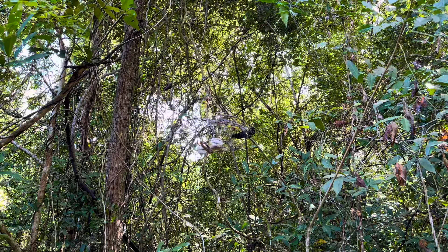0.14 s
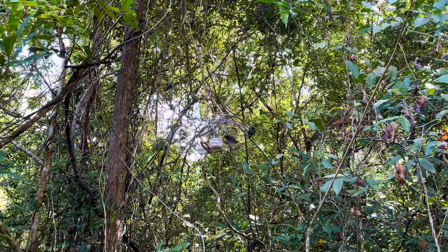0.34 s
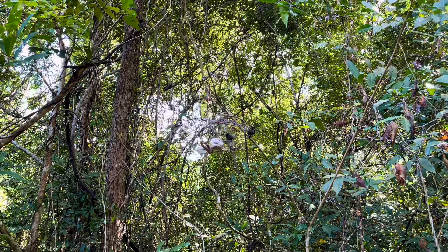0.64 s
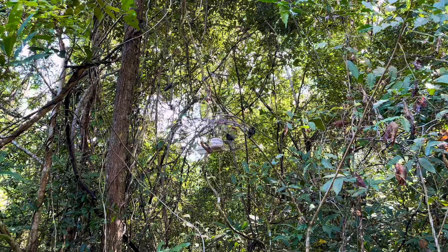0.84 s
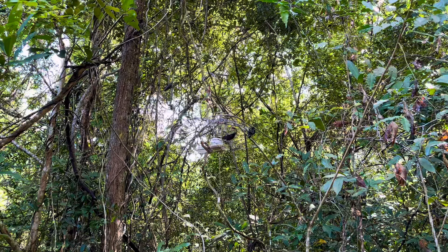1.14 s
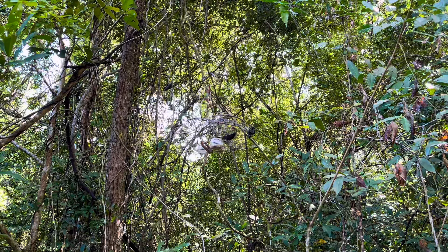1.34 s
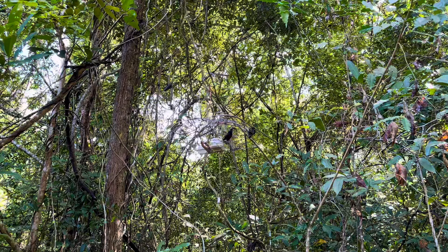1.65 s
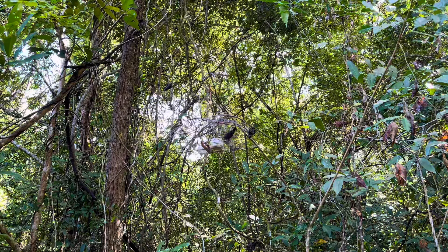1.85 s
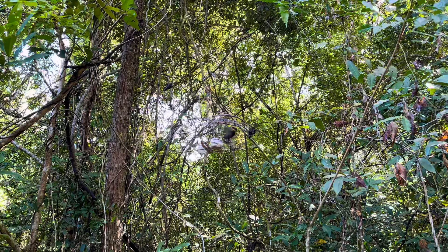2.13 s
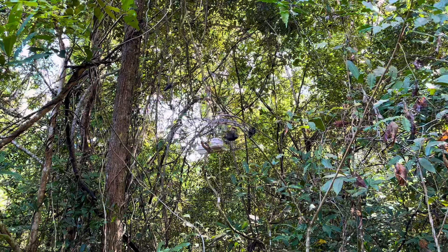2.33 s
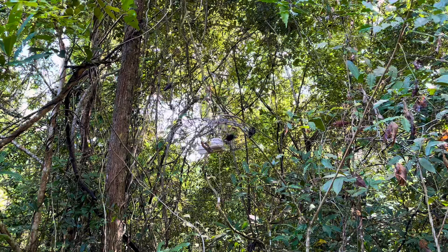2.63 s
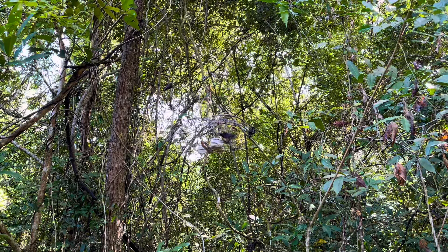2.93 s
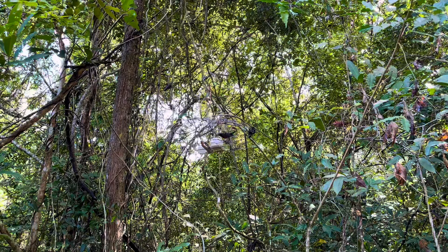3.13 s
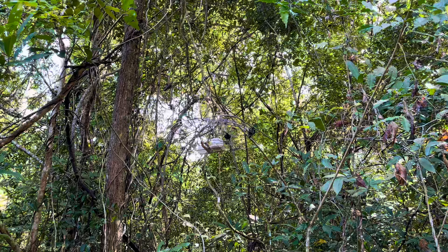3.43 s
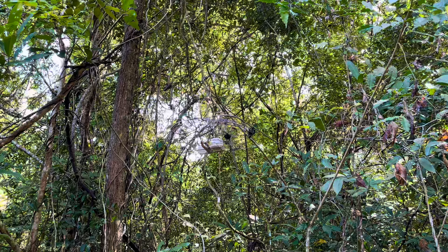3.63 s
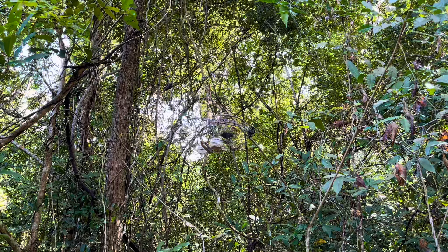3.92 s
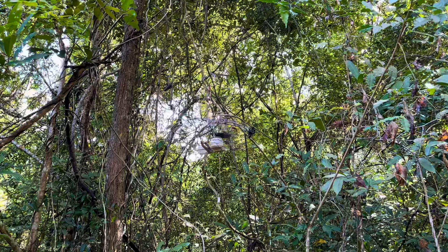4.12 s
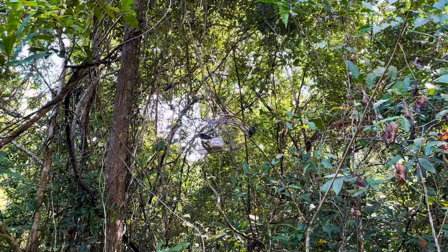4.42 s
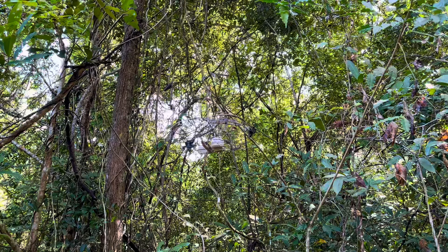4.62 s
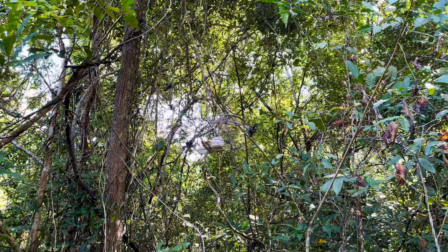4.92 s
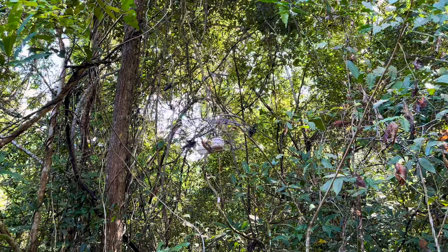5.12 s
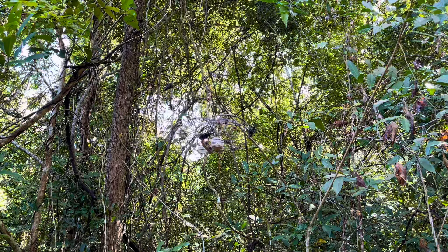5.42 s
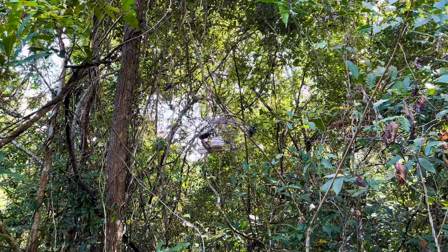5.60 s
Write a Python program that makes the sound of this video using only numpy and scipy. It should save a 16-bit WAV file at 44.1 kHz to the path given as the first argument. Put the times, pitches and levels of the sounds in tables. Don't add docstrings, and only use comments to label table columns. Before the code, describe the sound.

Crickets chirp in quick steady pulses to the left over a far insect chorus, while a small bird sings brief gliding chirps above faint rumble.

```python
import sys
import numpy as np
from scipy import signal
from scipy.fft import rfft, irfft, next_fast_len
from scipy.io import wavfile
from scipy.ndimage import uniform_filter1d, map_coordinates

SR = 44100
rng = np.random.default_rng(int(sys.argv[2]) if len(sys.argv) > 2 else 0)


def to_wav(sig):
    pcm = np.clip(np.atleast_2d(sig), -1, 1) * 32767
    pcm = np.round(pcm).astype(np.int16)
    wavfile.write(sys.argv[1], SR, pcm.T)


def makeup_ratio(level_db):
    decades = np.asarray(level_db, float) / 20
    return 10 ** decades


N = 254016


def unit(x):
    return x / np.sqrt(np.mean(x ** 2) + 1e-20)


def along(points, hz):
    f, v = np.transpose(points)
    return np.interp(np.log(hz + 1), np.log(f + 1), v)


def curve(rows):
    s, v = np.transpose(rows)
    return np.interp(np.arange(N) / SR, s, v)


def wobble(rate_hz, size=N):
    knots = rng.standard_normal(int(size * rate_hz / SR) + 4)
    return map_coordinates(knots, [np.arange(size) * rate_hz / SR])


def filtered(x, response):
    m = next_fast_len(N + 8192)
    return irfft(rfft(x, m) * response(np.fft.rfftfreq(m, 1 / SR)), m)[..., :N]


def ports(x, left_db, right_db, delay):
    late = filtered(x, lambda hz: np.exp(-2j * np.pi * hz * delay / SR))
    return np.array([makeup_ratio(left_db) * x, makeup_ratio(right_db) * late])


def add(track, s, x):
    part = track[..., max(round(s * SR), 0):][..., :x.shape[-1]]
    part += x[..., :part.shape[-1]]


def rush(spectrum, patchy_db):
    # f/Hz, correlation (-1 to 1)
    likeness = [(30, .92), (70, .94), (130, .87), (300, .25), (700, -.35), (4000, -.1), (8000, .4),
                (13000, .6)]
    z = signal.stft(rng.standard_normal((2, N + 512)), nperseg=512)[2]
    patches = uniform_filter1d(uniform_filter1d(rng.standard_normal(z.shape[1:]), 6, 0), 14, 1)
    pair = signal.istft(z * makeup_ratio(patchy_db * unit(patches)), nperseg=512)[1][:, :N]

    def mid_side(hz):
        turn_rad = np.arccos(np.clip(along(likeness, hz), -1, 1)) / 2
        return makeup_ratio(along(spectrum, hz)) * [np.cos(turn_rad), np.sin(turn_rad)]

    mid, side = filtered(pair, mid_side)
    return unit(np.array([mid + side, mid - side]))


def thicket(x, late_db):
    # f/Hz, t60/s, level/dB
    leaves = [(1000, 0.12, 0.5), (2600, 0.097, -2.5), (3250, .08, -1.5), (4800, 0.14, 0.5),
              (6250, 0.095, 4.5), (7440, 0.076, 3.5), (14600, 0.03, -5.5)]
    # f/Hz, correlation (-1 to 1)
    likeness = [(3000, .3), (5000, -.2), (7000, .3), (9000, .5), (14000, .65)]
    out, step = np.zeros((2, N)), SR // 3
    hz, t, z = signal.stft(rng.standard_normal((N // step + 1, 2, step)), SR, nperseg=256)
    turn_rad = np.arccos(np.clip(along(likeness, hz), -1, 1))[:, None] / 2
    z = z[:, :1] * np.cos(turn_rad) + z[:, 1:] * np.sin(turn_rad) * [[[1]], [[-1]]]
    t60, db = (along(np.array(leaves)[:, [0, k]], hz)[:, None] for k in (1, 2))
    decay = makeup_ratio(-60 * t / t60) + makeup_ratio(late_db - 60 * t / (4 * t60))
    tails = signal.istft(z * makeup_ratio(db) * decay, SR, nperseg=256)[1]
    for k, tail in enumerate(tails):
        block = x[None, k * step:][:, :step]
        echo = signal.fftconvolve(block, tail / np.linalg.norm(tail[0]), axes=1)
        add(out, k * step / SR + 0.0034, echo)
    return out


def traffic():
    # t/s, level/dB
    road = [(0.0, -53), (0.03, -52), (0.3, -58), (0.35, -49.5), (0.46, -54), (5.61, -52.5), (5.76, -59.5)]
    # f/Hz, density/(dB per Hz)
    rumble_spectrum = [(25, -37), (33, -21.5), (42, -6), (54, 1.5), (75, 0), (116, -5.5), (173, -12.5),
                       (219, -21.5), (300, -38), (390, -52.5), (660, -120)]
    # f/Hz, density/(dB per Hz)
    air_spectrum = [(130, -20.5), (220, -9.5), (300, -7.5), (500, -11), (1000, -15), (2000, -19.5),
                    (3000, -27), (3750, -19.5), (4200, -2), (4900, -2), (5500, -10.5), (6000, -16.5),
                    (6700, -18.5), (7250, -31.5), (8500, -17.5), (10000, -46), (11200, -42.5),
                    (13000, -29.5), (15800, -36.5)]
    # start/s, length/s, first f/Hz, last f/Hz, top level/dB
    whines = [
        (1.52, .12, 392, 380, -76),
        (1.65, .13, 332, 322, -69),
        (1.55, .47, 1140, 1262, -83),
        (3.85, 1.3, 445, 450, -87),
        (4.1, .7, 1265, 1345, -77),
        (5.36, .08, 1520, 1540, -72),
        (5.43, .12, 1535, 1520, -65),
        (5.6, .11, 1520, 1550, -78),
        (5.71, .08, 1870, 1760, -77),
    ]
    rumble_db = curve(road) + 1.3 * wobble(7.4)
    air_db = -62.5 + 0.4 * wobble(2.8)
    drone = np.zeros(N)
    for hz, db in ((166, -66.5), (133, -66)):
        level = makeup_ratio(db + 2.5 * wobble(4))
        drone += level * np.sin(2 * np.pi * np.cumsum(hz + 2.0 * wobble(3)) / SR)
    whine = np.zeros(N)
    waver, breaks_db = 0.009 * wobble(90), 3 * wobble(12)
    for s, length, first_hz, last_hz, db in whines:
        u = np.clip((np.arange(N) / SR - s) / length, 0, 1)
        hz = (first_hz + (last_hz - first_hz) * u) * (1 + waver * (1 + 3 * length))
        phase = 2 * np.pi * np.cumsum(hz) / SR
        level = makeup_ratio(db + breaks_db * min(length / 0.5, 1))
        whine += level * np.abs(np.sin(np.pi * u)) * np.sin(phase)
    rumble = makeup_ratio(rumble_db) * rush(rumble_spectrum, patchy_db=-1.0) * makeup_ratio([[1.1], [-1.3]])
    rumble = np.array([rumble[0], np.roll(rumble[1], 24)])
    air = makeup_ratio(air_db) * rush(air_spectrum, patchy_db=3.0) * makeup_ratio([[2.1], [-2.4]])
    return rumble + drone + air + ports(whine, 6.4, -3.0, delay=19)


def stroke(length_ms, first_hz, last_hz):
    u = np.linspace(0, 1, max(round(length_ms * SR / 1000), 8))
    phase = 2 * np.pi * np.cumsum(first_hz + (last_hz - first_hz) * u) / SR
    scrape = np.diff(rng.standard_normal(SR // 40))[:len(u)]
    over = np.sin(2 * phase) + makeup_ratio(-18.5) * np.sin(3 * phase) + makeup_ratio(-4) * scrape
    tone = np.sin(np.pi * u) ** 2 * np.sin(phase)
    return np.array([tone, np.sin(np.pi * u ** 0.75) ** 2.43 * over])


def chorus(count=1200):
    # t/s, level/dB
    swell = [(0, -66), (.9, -63), (1.7, -68.5), (2.5, -67), (3.1, -63.5), (4.7, -62), (5.3, -62.5),
             (5.76, -60.5)]
    wings = np.zeros((2, N))
    for s, pitch, length, size in rng.random((count, 4)):
        first_hz = 4800 + 600 * pitch ** 1.3
        add(wings, s * N / SR, makeup_ratio(9 * size) * stroke(5 + 5 * length, first_hz, first_hz - 1050))
    song = wings[0] + makeup_ratio(-29.5) * wings[1]
    both = ports(song, -1.5, -6, delay=15) + thicket(song, late_db=-6) * makeup_ratio([[-12], [-13]])
    return makeup_ratio(curve(swell) + 9.0) * unit(both)


def cricket(chirps, wing):
    wings = np.zeros((2, N))
    chance = rng.standard_normal((len(chirps), len(wing), 3))
    for (s, db), draws in zip(chirps, chance):
        for (ms, length_ms, first_hz, last_hz, stroke_db), (a, b, c) in zip(wing, draws):
            tune = 1 + 0.011 * a
            closure = stroke(length_ms * (1 + 0.074 * b), first_hz * tune, last_hz * tune)
            add(wings, s + (ms - length_ms / 2) / 1000, makeup_ratio(db + stroke_db + 0.49 * c) * closure)
    return wings


def crickets():
    # t/s, peak level at the left port/dB
    chirps_near = [(0.1192, -34), (0.3107, -32), (0.5173, -34.5), (0.733, -33.5), (0.946, -35),
                   (1.1276, -32), (1.3112, -33.5), (1.4934, -33.5), (1.6841, -33.5), (1.8808, -32.5),
                   (2.0872, -34.5), (2.268, -35.5), (2.443, -35), (2.629, -34), (2.8203, -33.5),
                   (3.005, -33.5), (3.2009, -36.5), (3.3872, -31.5), (3.589, -39), (3.785, -34),
                   (3.9795, -33), (4.1765, -34.5), (4.3718, -34), (4.5766, -33.5), (4.769, -33.5),
                   (4.957, -35.5), (5.1428, -36.5), (5.331, -33), (5.522, -33), (5.721, -33.5)]
    chirps_side = [(2.148, -35.5), (2.339, -36.5), (2.57, -35), (2.7817, -33.5), (2.9856, -34),
                   (3.1931, -33), (3.388, -37), (3.584, -32.5), (3.7972, -32), (4.0087, -33), (4.2162, -34),
                   (4.4301, -32.5), (4.687, -31), (4.924, -32), (5.1393, -32), (5.385, -32), (5.654, -33.5)]
    chirps_high = [(0.0779, -33.5), (0.2672, -36), (0.4554, -37), (0.646, -36), (0.8654, -33),
                   (1.0654, -34), (1.2568, -34), (1.4501, -33), (1.6368, -33.5), (1.8288, -33),
                   (2.0278, -32), (2.216, -31.5), (2.4052, -34.5), (2.6049, -31), (2.8005, -32),
                   (3.0176, -36.5), (3.208, -35), (3.399, -30.5), (3.601, -44.5), (3.802, -43),
                   (3.9934, -38), (4.193, -36), (4.4155, -33.5), (4.6163, -36), (4.8536, -37),
                   (5.0546, -34.5), (5.2663, -34.5), (5.4588, -35.5), (5.6592, -33.5)]
    # t/s, peak level/dB
    chirps_stray = [
        (1.552, -50),
        (1.71, -42.5),
    ]
    # offset/ms, length/ms, first f/Hz, last f/Hz, level/dB
    wing_near = [
        (-15, 8.5, 4950, 3950, -2.5),
        (.1, 17, 4800, 4080, 0),
    ]
    wing_side = [
        (-15.5, 6.5, 4700, 3400, -8),
        (-1, 12, 5200, 3500, 0),
    ]
    wing_high = [
        (-14, 6.5, 5250, 4300, -7),
        (.1, 11, 5250, 4300, 0),
    ]
    # right port/dB, right delay/samples, overtones left/dB, overtones right/dB
    places = [
        (-8, 12.7, -35, -34),
        (-42, 44, -29.5, -23.5),
        (-6.5, 13.57, -38, -35),
    ]
    all_chirps = (chirps_near, list(chirps_stray) + list(chirps_side), chirps_high)
    direct, scatter = 0, 0
    for chirps, wing, place in zip(all_chirps, (wing_near, wing_side, wing_high), places):
        tone, over = cricket(chirps, wing)
        right_db, delay, over_left_db, over_right_db = place
        direct += ports(tone, 0, right_db, delay) + over * makeup_ratio([[over_left_db], [over_right_db]])
        scatter += tone + makeup_ratio(over_left_db + 13) * over
    return direct + makeup_ratio([[-10], [-14]]) * thicket(scatter, late_db=-13.0)


def soloists():
    # t/s, peak level/dB, middle f/Hz
    strokes = [(0.1494, -31.5, 4490), (0.1613, -42, 4630), (0.1839, -42, 4750.0), (0.2082, -44.5, 4660.0),
               (0.252, -41, 4790), (0.3416, -42.5, 4600), (0.4424, -39.5, 4600), (0.5405, -43.0, 4460.0),
               (0.67, -46, 4900), (0.6789, -46, 4700), (0.6883, -40.5, 4460.0), (0.7, -36.5, 4700),
               (0.7658, -58, 4760.0), (0.7848, -38.5, 4470.0), (0.8304, -38.5, 4500), (1.0833, -35, 4680),
               (1.1643, -44, 4450), (1.2441, -49, 4650), (1.3316, -40.5, 4420), (1.5543, -59, 4500),
               (1.6572, -38, 4820.0), (1.9377, -45, 4510.0), (1.9734, -43.0, 4700), (2.0454, -43, 4800),
               (2.133, -48.5, 4420.0), (2.1701, -51, 4400), (2.2905, -41, 4300), (2.3826, -33.5, 4620),
               (2.8507, -49, 4530), (2.8927, -49, 4510.0), (2.9414, -39.5, 4800), (3.1211, -38, 4630.0),
               (3.2224, -41.5, 4580), (3.2508, -51.5, 4650), (3.4959, -41, 4600), (3.6381, -53, 4600),
               (3.6682, -43.8, 4420), (3.6802, -39, 4840.0), (3.7082, -37.5, 4500.0), (3.7378, -54, 4700),
               (3.8708, -38, 4730), (3.904, -42.5, 4700), (3.9225, -42, 4760), (3.9363, -48.5, 4730),
               (4.063, -37.5, 4770), (4.0842, -46.5, 4690.0), (4.1162, -46, 4530), (4.1327, -45, 4460.0),
               (4.2624, -41.5, 4530), (4.3176, -45, 4800.0), (4.34, -51, 4630), (4.5109, -39, 4700),
               (4.6613, -36.5, 4580.0), (4.8278, -47, 4560), (4.8426, -42, 4680), (5.0123, -39.5, 4474),
               (5.1047, -41, 4530), (5.2062, -37, 4750), (5.558, -49.5, 4350), (5.6052, -48, 4540)]
    length_ms, fall_hz = 9, 950
    wings = np.zeros((2, N))
    for s, db, hz in strokes:
        closure = stroke(length_ms, hz + fall_hz / 2, hz - fall_hz / 2)
        add(wings, s - length_ms / 2000, makeup_ratio(db - 2.5) * closure)
    song = wings[0] + makeup_ratio(-25.5) * wings[1]
    return ports(song, -0.46, -11, delay=15.8)


def syllables():
    song = {"fall": [(.2695, 1.02, 1.002, -49)], "sweep": [(4.686, 1.001, 1.001, -46)],
            "crest": [(4.738, 0.73, .8, -49)], "hump": [(.478, 1.07, 1, -45.5), (.846, 1.08, 1.017, -46),
            (1.857, 1.1, .95, -47), (3.269, 1.04, 0.98, -45.5)], "dip": [(.937, 0.98, 0.75, -59),
            (1.951, 1, 0.85, -55.5), (3.356, 0.9, 1.1, -56)], "peak": [(.9982, 0.97, 1.04, -41.5),
            (2.0115, 1.02, 1.01, -42.5)], "spike": [(.615, 1.08, .99, -42), (3.4125, 1.01, 1.01, -41.5)],
            "hook": [(.386, 1, 1, -45), (.718, 0.87, 1.01, -46), (1.093, 0.74, 1.003, -43.5),
            (3.506, 0.71, 1, -43.5)]}
    follows = {"hump": ("rise", 0.026, 0.99, 0.98, 1.5), "dip": ("lift", 0.017, 0.9, 0.98, 8.6),
               "sweep": ("crest", .051, 1.001, 1.001, 1.5)}
    for name, rows in song.items():
        for s, stretch, factor, db in rows:
            yield name, s, stretch, factor, db
            if name in follows:
                second, lag_s, own_stretch, own_factor, louder_db = follows[name]
                yield second, s + lag_s * stretch, own_stretch, own_factor, db + louder_db


def bird(rasp=0.7, flutter=1.7, flutter_hz=620):
    # t/ms, f/Hz, level/dB
    FALL = [(0, 2800, -9), (5, 2700, 0), (13, 2480, 0), (22, 2080, -4), (31, 1500, -12)]
    HOOK = [(0, 3280, -10), (4, 3150, -2), (11, 3030, 0), (17, 3020, 0), (20, 3350, -3), (26, 5000, -1),
            (32, 6100, -6)]
    HUMP = [(0, 2650, -6), (6, 2850, 0), (11, 2900, 0), (16, 2550, -5), (22, 1800, -16)]
    RISE = [(0, 2550, -16), (4, 3150, -6), (10, 3400, -1), (17, 3480, 0), (25, 3560, -4)]
    PEAK = [(0, 2200, -9), (3, 3500, -3), (6.5, 4600, 0), (10, 3000, -4), (13, 2150, -6), (20, 2050, -10),
            (34, 1950, -22)]
    DIP = [(0, 2400, -20), (4, 1950, -2), (9, 1400, -3), (17, 1150, -9)]
    LIFT = [(0, 1700, -16), (4, 2600, -4), (9, 2900, 0), (14, 2900, -6)]
    SWEEP = [(0, 2300, -24), (12, 2500, -7), (26, 2900, 0), (36, 3500, -4), (48, 4500, -6), (58, 5300, -10)]
    CREST = [(0, 4900, -14), (6, 5700, 0), (14, 6900, -1), (24, 6900, -12)]
    SPIKE = [(0, 2000, -9), (3, 3300, -3), (6.5, 4600, 0), (10, 3000, -4), (14, 2150, -11), (24, 1900, -22)]
    voices = {"fall": (FALL, (-2.5, -16.5, -13, -8)), "hook": (HOOK, (-8.5, -12.5, -7, -25.5)),
              "hump": (HUMP, (-7.5, -8, -9, -11)), "rise": (RISE, (-13.5, -12, -7.5, -21)),
              "peak": (PEAK, (-7.5, -10.5, -11, -18)), "spike": (SPIKE, (-6.5, -12.5, -7, -21)),
              "dip": (DIP, (5.5, 0.5, -19, -8)), "lift": (LIFT, (-10.5, -10.5, -5, -8.5)),
              "sweep": (SWEEP, (0, -1, 0.5, -7)), "crest": (CREST, (-6, -12.5, -14, -25))}
    roughness = {"fall": .22, "hook": .07, "hump": .15, "rise": .14, "peak": .3, "spike": .3, "dip": .6,
                 "lift": .4, "sweep": .48, "crest": .6}
    # f/Hz, level/dB
    beak = [(1200, -12), (3000, -4.5), (6000, 7.5), (9000, 2.5), (14000, 11.5)]
    # f/Hz, left-right/dB, left lead/rad
    bearing = [(2000, 0.5, 0.96), (3460, 3, 0.69), (6660, 6.5, 0.95), (9900, 0.5, 1.54),
               (12900, 10.5, 0.18)]
    # f/Hz, level/dB
    direct_treble = [(9500, 0), (11500, -22)]
    voice = np.zeros(N)
    span = SR // 14
    for name, s, stretch, factor, note_db in syllables():
        (shape, overtones_db), rough = voices[name], roughness[name]
        ms, hz, db = np.transpose(shape)
        t_ms = np.arange(0, ms[-1] * stretch, 1000 / SR)[:span]
        shake = wobble(700, size=span)[:len(t_ms)]
        swell = rough * np.tanh(wobble(1400, size=span)[:len(t_ms)])
        air = rng.standard_normal(span + 4)
        pitch = uniform_filter1d(np.interp(t_ms, ms * stretch, hz * factor), 60)
        phase = 2 * np.pi * np.cumsum(pitch * (1 + 0.04 * rough * shake)) / SR
        edge = np.clip(np.minimum(t_ms, t_ms[-1] - t_ms) / 2.2, 0, 1)
        over = np.zeros(len(t_ms))
        for k, db_k in enumerate(overtones_db, 2):
            over += makeup_ratio(db_k) * np.sin(k * phase) * (k * pitch < SR / 2)
        over *= 1 + flutter * rough * np.sin(2 * np.pi * flutter_hz * t_ms / 1000)
        over += rasp * rough ** 2 * (air[4:] - air[:-4])[:len(t_ms)]
        level = makeup_ratio(note_db + np.interp(t_ms, ms * stretch, db)) * edge
        add(voice, s, level * (np.sin(phase) * (1 + swell) + over * (1 + 2.0 * swell)))
    voice = filtered(voice, lambda f: makeup_ratio(along(beak, f)))

    def path(f):
        pan_db, lead_rad = (along(np.array(bearing)[:, [0, k]], f) for k in (1, 2))
        level = makeup_ratio(along(direct_treble, f) + [pan_db / 2, -pan_db / 2])
        return level * np.exp([0 * f, -1j * lead_rad])

    return filtered(voice, path) + makeup_ratio([[-5], [-7]]) * thicket(voice, late_db=-8)


def twigs():
    # t/s, peak level/dB, thud/dB, snap/dB, left-right/dB
    ticks = [(2.6512, -52.5, -6, -4, 4), (2.891, -50, -9.5, -4, 12.5), (3.967, -78.5, 17, 28, 12),
             (4.1767, -46, -15, -18, 5), (4.1852, -71, -18, 25, -13), (4.5129, -61, -9, -8, 5),
             (5.1716, -54.5, -9, 1.5, 12), (5.199, -61, -22, -16, 32), (5.2278, -57.5, -7, -3, 10),
             (5.435, -57.5, -30, 14.5, 15), (5.655, -54, -24, -14, 13), (5.682, -52.5, -13, 0, 7)]
    thud_lead_s = 0.00675
    out, t = np.zeros((2, N)), np.arange(SR // 20) / SR

    def burst(low_hz, high_hz):
        sos = signal.butter(2, [low_hz, high_hz], "band", fs=SR, output="sos")
        x = signal.sosfilt(sos, rng.standard_normal(len(t)) * makeup_ratio(-60 * t / 0.015))
        return x / np.abs(x).max()

    for s, db, thud_db, snap_db, pan_db in ticks:
        pan = makeup_ratio([[pan_db / 2], [-pan_db / 2]])
        tick = burst(900, 3500) + makeup_ratio(snap_db) * burst(4400, 12000)
        add(out, s, makeup_ratio(db - 5.0) * tick * pan)
        add(out, s - thud_lead_s, makeup_ratio(db + thud_db - 5) * burst(300, 700) * pan)
    return out + makeup_ratio(-1.5) * thicket(out.mean(0), late_db=-11)


def scene():
    # f/Hz, level/dB
    treble = [(9300, 2), (10300, -8), (11000, -30), (12200, -16.5), (13500, -2), (16000, -2)]
    singers = crickets() + chorus() + soloists() + bird() + twigs()
    return filtered(singers, lambda hz: makeup_ratio(along(treble, hz))) + traffic()


def roll_off(x):
    return signal.sosfilt(signal.butter(12, 15990, fs=SR, output="sos"), x)


def record(dry):
    # f/Hz, level/dB
    notch = [(6800, 0), (7250, -7), (7750, 0)]
    top_hz = 15830
    mix = filtered(dry, lambda hz: makeup_ratio(along(notch, hz)) * (hz < top_hz))
    return roll_off(mix)


dry = scene()
out = record(dry)
to_wav(out)
```